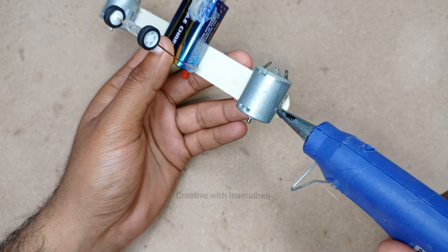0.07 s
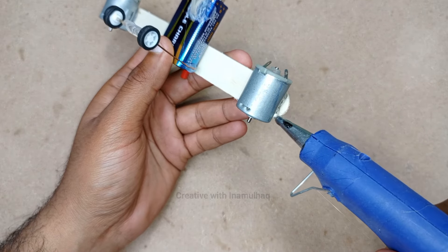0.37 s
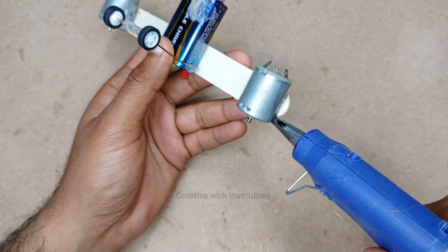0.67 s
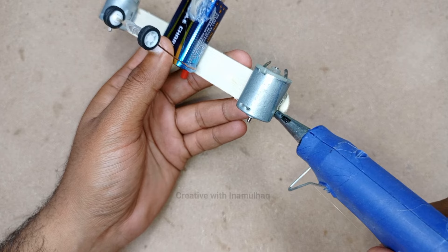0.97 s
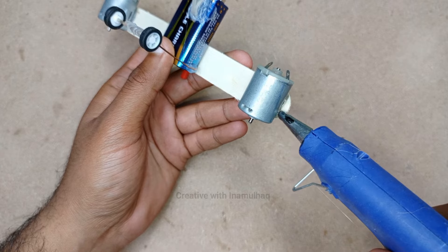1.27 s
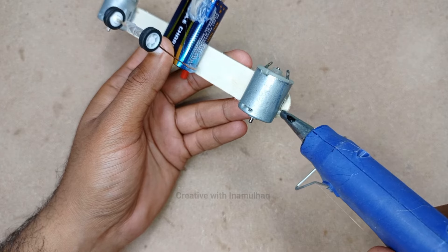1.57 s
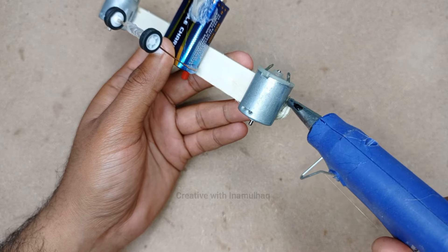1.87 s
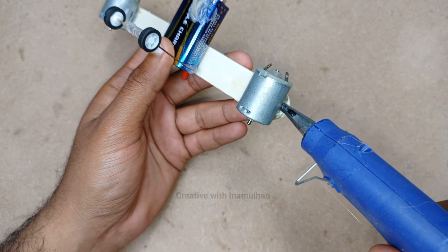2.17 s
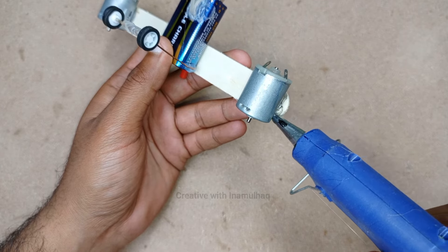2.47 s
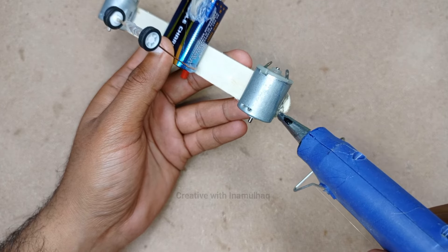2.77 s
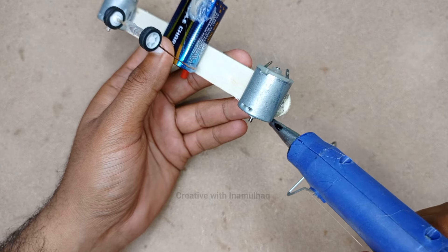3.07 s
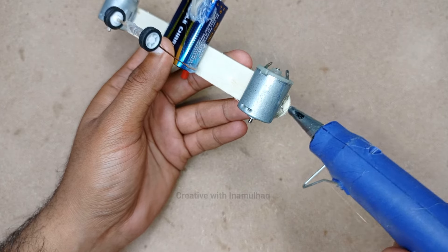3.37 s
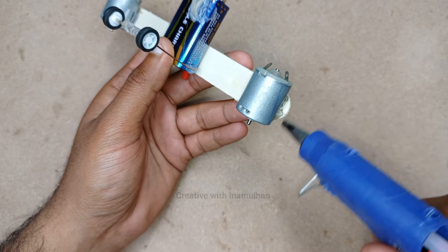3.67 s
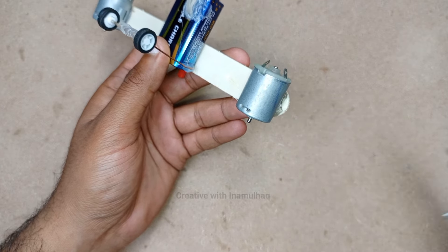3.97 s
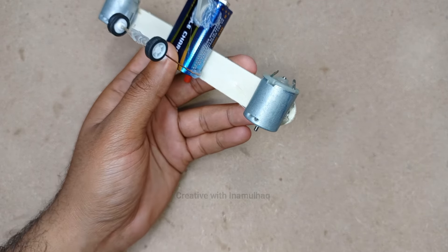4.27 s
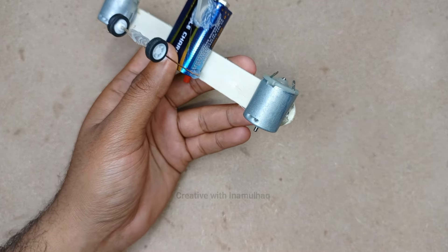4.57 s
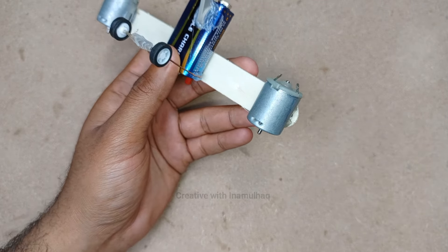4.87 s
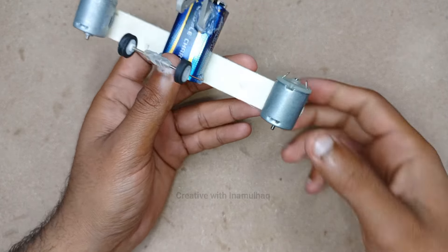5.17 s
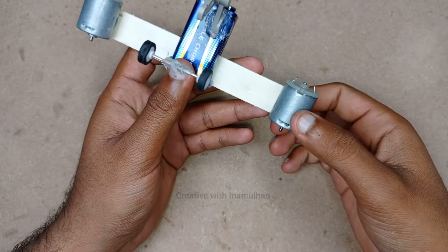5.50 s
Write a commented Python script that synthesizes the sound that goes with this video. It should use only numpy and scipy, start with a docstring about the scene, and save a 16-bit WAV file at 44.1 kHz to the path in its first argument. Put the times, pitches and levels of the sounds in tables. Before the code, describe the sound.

Small sharp plastic clicks from a hot glue gun, followed by a short scrape and one louder clattering knock as it is put down.

```python
"""In a quiet room, a hot glue gun is worked against a small hobby model, close to the microphone.
Its trigger clicks and ratchets back, making the plastic shell ring. The gun scrapes over the work
surface in tiny catches and slips, then is set down with a rocking knock that rattles its loose parts.
Hands bump and rub softly, the model crackles, and faint hollow tones come and go over a low rumble."""
import sys
import numpy as np
from scipy import signal
from scipy.fft import rfft, irfft, next_fast_len
from scipy.io import wavfile

SR = 44100
rng = np.random.default_rng(int(sys.argv[2]) if len(sys.argv) > 2 else 0)


def inscribe(sig):
    """Save sig as 16-bit PCM at rate SR to the path in sys.argv[1].

    A 1-D sig is mono; a 2-D sig holds one channel per row.
    Samples are clipped to [-1, 1] before scaling.
    """
    pcm = np.round(np.clip(np.atleast_2d(sig).T, -1, 1) * 32767)
    wavfile.write(sys.argv[1], SR, pcm.astype(np.int16))


N = 252913
TIME = np.arange(N) / SR  # seconds since the scene began
AGE = np.arange(SR // 2) / SR  # seconds since one short sound began

# The notes at which the gun's shell and other small plastic parts ring.
# Each row: pitch in Hz, relative level in dB, fade time in seconds before damping.
PLASTIC_NOTES = [(1165, -14, 0.055), (1368, -2, 0.057), (1459, -10, 0.13), (1567, -10.5, .1),
                 (2189, 2, 0.079), (2424, -4, 0.057), (2862, -4, 0.1), (3240, 2, 0.03), (3403, 1.5, 0.086),
                 (4000, -3, .09), (4280, -3, 0.13), (4600, -7.5, 0.018), (5320, -8.5, 0.11),
                 (5754, -3.5, 0.098), (5960, -3.5, 0.072), (6495, -4.5, 0.13), (6580, -6, 0.09),
                 (7220, -2.5, 0.1), (7790, -19, 0.12), (9570, -10.5, 0.13), (12910, -15, .09),
                 (15060, -12, 0.046)]


def undb(db):
    """Turn decibels into a number to multiply a sound by."""
    return 10 ** (np.asarray(db) / 20)


def unit(x):
    """Scale a sound to an average power of 1."""
    return x / np.sqrt(np.mean(x ** 2))


def fade(fade_s):
    """Die away after a blow; the fade time is how long it takes to fall 60 dB."""
    return np.exp(-np.log(1000) * AGE / max(fade_s, 1e-3))


def hiss():
    """Half a second of fresh white noise."""
    return rng.standard_normal(len(AGE))


def add(track, start, sound):
    """Mix a sound into a track, start seconds in."""
    i = max(int(start * SR), 0)
    track[i:i + len(sound)] += sound[:N - i]


def colour(x, points):
    """Shape bass and treble along a curve of (Hz, dB) points; white noise keeps its power."""
    size = 2 * next_fast_len(len(x))
    octave = np.log2(np.maximum(np.arange(size // 2 + 1) * SR / size, 1))
    hz, db = np.transpose(points)
    gain = unit(undb(np.interp(octave, np.log2(hz), db)))
    # Fold the filter forward in time, so nothing sounds before the blow.
    cepstrum = irfft(np.log(gain))
    cepstrum[1:size // 2] *= 2
    cepstrum[size // 2 + 1:] = 0
    return irfft(rfft(x, size) * np.exp(rfft(cepstrum)))[:len(x)]


def butter(x, hz, kind, order=2):
    """Keep only the lows, the highs or a band between."""
    return signal.sosfilt(signal.butter(order, hz, kind, fs=SR, output="sos"), x)


def ring(notes, scatter_db, damping=1):
    """A struck object rings at its own notes; each blow lands elsewhere and mixes them anew."""
    chance = rng.standard_normal(len(notes))
    out = np.zeros(len(AGE))
    for k, (hz, db, fade_s) in enumerate(notes):
        strength = (-1) ** k * undb(db + scatter_db * chance[k])
        out += strength * np.sin(2 * np.pi * hz * AGE) * fade(fade_s / damping)
    return out


def excite(force, notes):
    """A changing force keeps an object ringing, with about the same power as the force."""
    response = ring(notes, scatter_db=4.5)
    return signal.fftconvolve(force, response / np.linalg.norm(response))[:N]


def strokes(rows, fade_s):
    """The loudness of a series of movements: each rises, holds, then fades."""
    power = np.zeros(N)
    for start, db, rise_s, hold_s in rows:
        rise = np.clip((TIME - start) / rise_s, 0, 1)
        fall = np.exp(-np.log(1000) * np.maximum(TIME - start - rise_s - hold_s, 0) / fade_s)
        power += (undb(db) * rise * fall) ** 2
    return np.sqrt(power)


def friction(loudness, per_second, spread_db):
    """Surfaces catch and slip, giving tiny kicks of uneven size at random moments."""
    size_db = spread_db * rng.uniform(-1, 1, N)
    slipping = rng.random(N) < per_second / SR
    kicks = slipping * rng.choice([-1, 1], N) * undb(size_db)
    return unit(kicks) * loudness


def room():
    """A low rumble and a thin hiss drift slowly in level."""
    # Each row: frequency in Hz, relative level in dB.
    rumble_colour = [(25, -28), (60, -13), (95, -3), (120, 2), (165, -3.5), (250, -21.5), (500, -23.5),
                     (800, -32), (2000, -38.5), (6300, -46), (8500, -58), (15500, -53.5)]
    level_db = -61
    drift_times = np.arange(0, N / SR + 1, .2)
    drift_db = 0.44 * np.interp(TIME, drift_times, rng.standard_normal(len(drift_times)))
    return unit(colour(rng.standard_normal(N), rumble_colour)) * undb(level_db + drift_db)


def hollow_tones():
    """Faint wavering tones swell and fade; the higher the tone, the shorter it lasts."""
    # Each row: middle in seconds, pitch in Hz, relative level in dB.
    tones = [(.232, 600, -61.5), (1.389, 2200, -66), (2.002, 547.5, -76.5), (2.753, 534, -51),
             (2.77, 970, -62), (2.777, 1570, -65), (3.023, 1532, -70.5), (3.32, 520, -58),
             (3.766, 590, -61.5), (3.995, 576.6, -50.5), (4.14, 670, -54), (4.59, 822, -57.5),
             (4.683, 490, -62.5)]
    cycles = 130
    out = np.zeros(N)
    for middle, hz, db in tones:
        length_s = cycles / hz
        waver = unit(butter(hiss(), [hz - 36, hz + 36], "bandpass"))
        tone = undb(-2) * np.sin(2 * np.pi * hz * AGE) + undb(-1) * waver
        count = min(int(length_s * SR), len(AGE))
        add(out, middle - length_s / 2, undb(db) * tone[:count] * np.hanning(count))
    return out


def crackle():
    """As the grip on the model changes, scattered tiny cracks make its plastic ring."""
    # Each row: start in seconds, level in dB, rise and hold times in seconds.
    grip_changes = [(4.5, -86.5, .05, 0.737)]
    cracks = friction(strokes(grip_changes, fade_s=.3), per_second=45, spread_db=4.5)
    return excite(cracks, PLASTIC_NOTES)


def hands():
    """Skin rustles faintly on the model; soft pushes swell and die away in the bass."""
    # Each row: start in seconds, level in dB, hold time in seconds.
    rubs = [(0.58, -80.5, 0.041), (1.201, -85, 0.34), (2.395, -83.5, 0.42), (3.666, -79, 0.95),
            (4.822, -80.5, 0.34), (5.425, -82, 0.29)]
    # Each row: frequency in Hz, relative level in dB.
    rustle_colour = [(300, -16.5), (900, 7.5), (1600, 6.5), (3000, -0.5), (5800, -2.5), (8000, -23),
                     (10800, -8), (13000, -31), (15500, -14)]
    # Each row: start in seconds, level in dB, seconds to reach the peak.
    bumps = [(0.593, -44.5, 0.022), (0.731, -48.5, 0.047), (1.238, -40.5, .014), (2.367, -48.5, 0.025),
             (2.629, -43.5, 0.037), (2.7, -40.5, 0.025), (4.781, -36, 0.037), (4.844, -32, 0.024),
             (4.895, -33, 0.022), (4.955, -41.5, .019)]
    rub_rise_s, bump_hz = 0.045, 119.8
    rubbing = strokes([(start, db, rub_rise_s, hold_s) for start, db, hold_s in rubs], fade_s=1.46)
    out = colour(friction(rubbing, per_second=14000, spread_db=2), rustle_colour)
    for start, db, rise_s in bumps:
        swell = (AGE / rise_s * np.exp(1 - AGE / rise_s)) ** 3
        low_noise = unit(butter(hiss(), [70, 210], "bandpass", order=4))
        thud = np.sin(2 * np.pi * bump_hz * AGE) + undb(-16) * low_noise
        add(out, start, undb(db) * swell * thud)
    return out


def slide():
    """The gun brushes, drags, then scrapes over the surface; its shell rasps and sometimes catches."""
    # Each row: start in seconds, relative level in dB, rise and hold times in seconds.
    drags = [(3.68, -73.5, 0.035, 0.13), (3.934, -55.5, 0.0066, 0.13), (4.02, -46, 0.01, 0.071),
             (4.052, -33.5, 0.004, 0.035)]
    # Each row: frequency in Hz, relative level in dB.
    scrape_colour = [(100, -42), (210, -14), (290, 8.5), (650, -1), (900, 7), (1400, -6.5), (1900, -3),
                     (2700, -4.5), (3600, -14), (7000, -21), (8500, -37), (15000, -37.5)]
    # Each row: pitch in Hz, relative level in dB, fade time in seconds.
    rasp_notes = [(312, -7.5, 0.44), (520, 4, 0.11), (655, 8, 0.053), (882.5, -1, 0.067), (1270, 2, 0.1),
                  (1410, 9, 0.048), (1637, -14.5, 0.062), (2193, 3.5, 0.059), (2660, -2, 0.028),
                  (6410, -3, 0.042)]
    # Each row: start in seconds, relative level in dB.
    catches = [(3.943, -55), (4.044, -37), (4.058, -27.5), (4.064, -20), (4.071, -50), (4.090, -43.5),
               (4.096, -31.5)]
    force = friction(strokes(drags, fade_s=0.18), per_second=4900, spread_db=3)
    out = undb(-2) * colour(force, scrape_colour) + undb(-5.5) * excite(force, rasp_notes)
    for start, db in catches:
        catch = hiss() * fade(0.0024)
        sharp_edge = butter(catch, [5400, 7500], "bandpass", order=4)
        add(out, start, undb(db) * (sharp_edge + undb(-8) * colour(catch, scrape_colour)))
    return out


def set_down():
    """The gun lands and rocks, ringing the work surface; a softer contact sounds duller."""
    # Each row: start in seconds, relative level in dB, bass and treble cut-offs in Hz.
    knocks = [(4.3150, -16.5, 308, 1700), (4.3278, -23, 250.4, 2210), (4.3500, -10.5, 113.6, 2980),
              (4.3580, -13.5, 557.3, 1200), (4.3884, -18, 199, 1600), (4.4020, -15.5, 160.6, 900),
              (4.43, -18, 178, 753), (4.4450, -18, 114.5, 279), (4.536, -32.5, 128, 904),
              (4.576, -23.5, 100, 192)]
    # Each row: pitch in Hz, relative level in dB, fade time in seconds before damping.
    surface_notes = [(126, -3, 0.3), (149.1, -11.5, 0.86), (166.9, -4, 0.34), (210.7, -1, 0.22),
                     (240, -28.5, 0.11), (319, -12, .26), (384.5, -16.5, 0.089), (404, -19, 0.068),
                     (516.3, -20, 0.23), (539, -25.5, 0.093), (590, -24.5, 0.11), (697, -16.5, 0.11),
                     (713, -9.5, 0.069), (896, -21.5, 0.093), (1030, -38, 0.11), (1295, -24, 0.12),
                     (1318, -27.5, 0.072), (2740, -28, 0.037), (5760, -29, 0.064)]
    # Each row: frequency in Hz, relative level in dB.
    clatter_colour = [(50, -12), (130, 6.5), (350, 12), (480, 3.5), (750, -1.5), (1400, -9.5), (2000, -13),
                      (2800, -11.5), (4500, -12.5), (7000, -12), (8300, -22), (15000, -9.5)]
    out = np.zeros(N)
    for start, db, low_hz, contact_hz in knocks:
        # A glancing blow misses the low notes and clatters more: 5.5 dB for each octave missed.
        clatter_db = -8.5 + 5.5 * np.log2(low_hz / 109)
        clatter = colour(hiss() * (fade(0.02) + undb(-11.5) * fade(0.16)), clatter_colour)
        blow = undb(-4) * ring(surface_notes, scatter_db=2.5, damping=1.1) + undb(clatter_db) * clatter
        blow *= 1 - np.exp(-AGE * contact_hz / 0.95)  # the force builds up during contact
        blow = butter(blow, low_hz, "highpass")
        add(out, start, undb(db) * butter(blow, contact_hz, "lowpass"))
    return out


def rattle():
    """Loose parts chatter as the gun lands and again as it settles."""
    # Each row: start in seconds, level in dB, rise and hold times in seconds.
    shakes = [(4.347, -40.5, .03, 0.034), (4.535, -70.5, 0.008, .13)]
    # Each row: pitch in Hz, relative level in dB, fade time in seconds.
    loose_part_notes = [(726, 7, 0.096), (929, 8.5, 0.074), (990, -5, .06), (1240, 0.5, 0.025),
                        (1436, 2.5, 0.09), (1620, -3, 0.14), (1987, -3.5, 0.052), (2150, -10.5, 0.058),
                        (2460, -8.5, 0.023), (2760, -3.5, .05), (2845, 0, 0.023), (4290, -18, 0.026),
                        (5420, -18, 0.067), (5300, -20.5, 0.055), (6950, -22, 0.054)]
    chatter = friction(strokes(shakes, fade_s=0.14), per_second=1000, spread_db=9)
    return excite(chatter, loose_part_notes)


def ratchet(count):
    """Click rows for the trigger springing back: each tooth comes sooner, softer and duller."""
    start, first_gap_s, gap_ratio = 3.3035, .0455, .78
    teeth, fade_s = [], 0.077
    for k in range(count):
        db, treble_db = -55 - 2 * k, -10.5 - 6.5 * k
        teeth.append((start, db, treble_db, fade_s))
        start += first_gap_s * gap_ratio ** k
    return teeth


def trigger():
    """The trigger and glue feed snap: a sharp crack, a ringing shell and a wash of nearby echoes."""
    # Each row: start in seconds, level of the first 10 ms in dB, treble in dB, echo fade in seconds.
    clicks = [(.0058, -32, -0.5, 0.061), (.0095, -46, 6, .18), (.0312, -36, -13, 0.05),
              (0.043, -38, -1.5, 0.027), (0.045, -38, 4, 0.089), (.23, -58, -53, 0.26),
              (0.266, -45, 6, 0.083), (1.4818, -39, 11, 0.12), (2.659, -38.5, -3, 0.032),
              (2.67, -38, -5, 0.13), (2.7941, -35, -18.5, 0.09), (3.2162, -44, -8, 0.054),
              (3.4912, -63, -1, 0.057), (3.726, -67, -27.5, 0.16)]
    # Tiny high ticks. Each row: start in seconds, relative level in dB, pitch in Hz.
    ticks = [(.115, -60, 11600), (.142, -58, 11600), (.171, -63, 11700), (0.441, -64, 11270),
             (0.799, -51.5, 14400), (1.283, -60.5, 11100), (5.165, -66, 10900)]
    out = np.zeros(N)
    echoes = hiss()  # the gun hardly moves, so its echoes repeat
    for start, db, treble_db, fade_s in clicks + ratchet(count=5):
        crack = undb(-10) * hiss() * fade(.018) + 2.4 * (AGE == 0)
        wash = undb(-12.5) * echoes * fade(fade_s)
        shell = undb(-22.5) * ring(PLASTIC_NOTES, scatter_db=3, damping=.1 / fade_s)
        snap = click_tone(crack + wash, shell, treble_db)
        add(out, start, undb(db) * snap / np.std(snap[:SR // 100]))
    for start, db, hz in ticks:
        ping = undb(-8) * np.sin(2 * np.pi * hz * AGE) * fade(0.03)
        fizz = undb(-12.5) * butter(hiss(), 5000, "highpass") * fade(0.031)
        add(out, start, undb(db) * (ping + fizz))
    return out


def click_tone(noise, shell, treble_db):
    """Shape a click's noise, add the ringing shell, then brighten or dull them both."""
    # Each row: frequency in Hz, relative level in dB.
    click_colour = [(300, -45), (950, -30.5), (1300, -14), (1950, -6.5), (2250, -2), (4200, 3),
                    (5300, -3.5), (7300, -2.5), (8200, -14), (11000, -9.5), (13800, -23), (15200, -14.5)]
    return colour(colour(noise, click_colour) + shell, [(4300, 0), (15000, treble_db)])


def scene():
    """All the sounds meet at one microphone."""
    gun = trigger() + set_down() + rattle() + slide()
    return (gun + hands() + hollow_tones() + room() + crackle())[None]


def record(dry):
    """The recorder cuts off the very highest treble."""
    top_hz = 16100
    return signal.sosfilt(signal.ellip(10, .2, 70, top_hz, fs=SR, output="sos"), dry)


dry = scene()
out = record(dry)
inscribe(out)
```